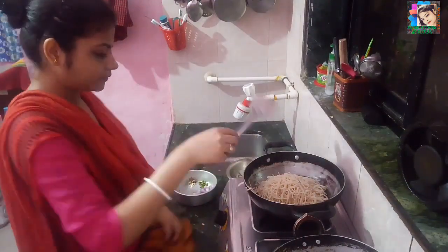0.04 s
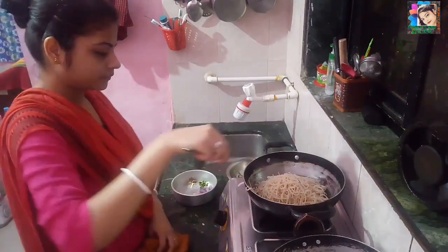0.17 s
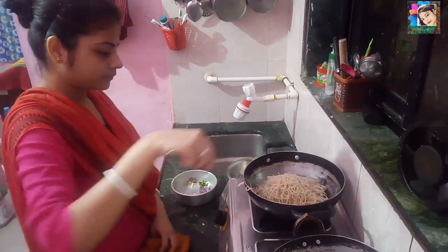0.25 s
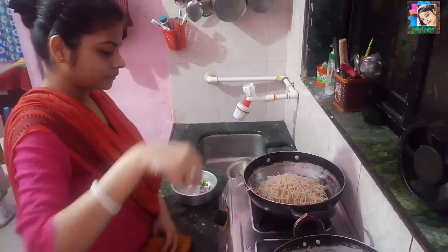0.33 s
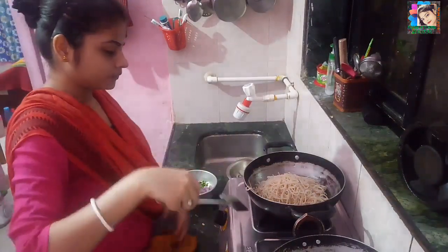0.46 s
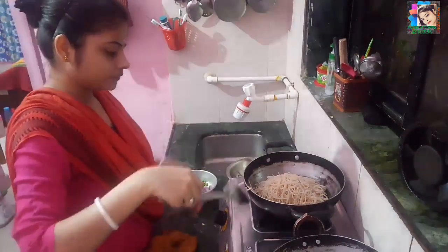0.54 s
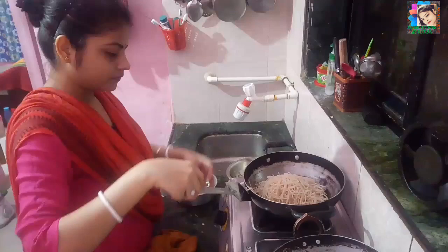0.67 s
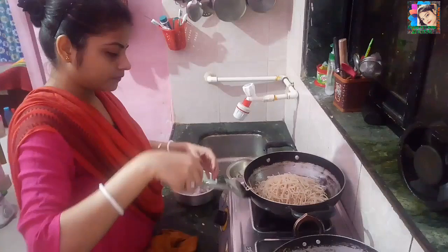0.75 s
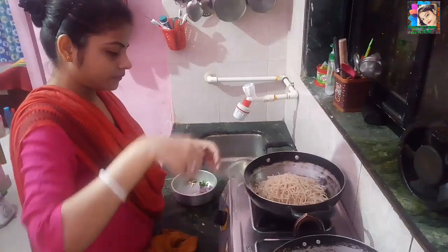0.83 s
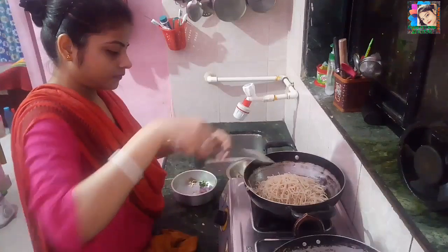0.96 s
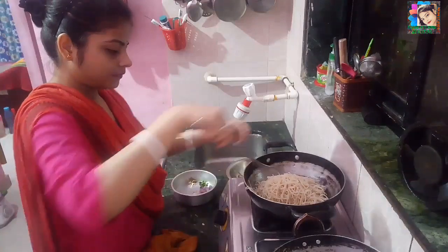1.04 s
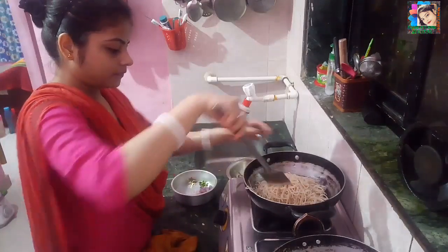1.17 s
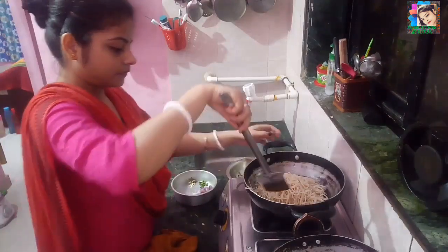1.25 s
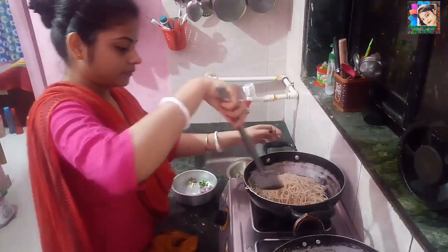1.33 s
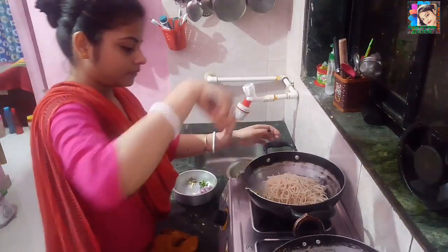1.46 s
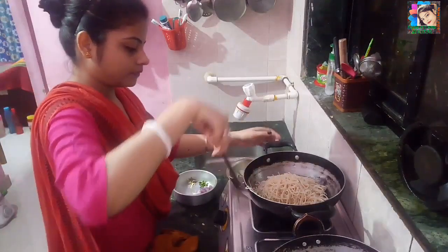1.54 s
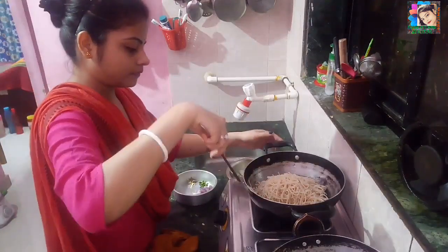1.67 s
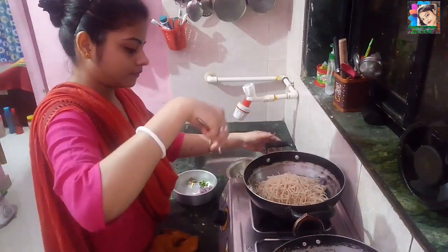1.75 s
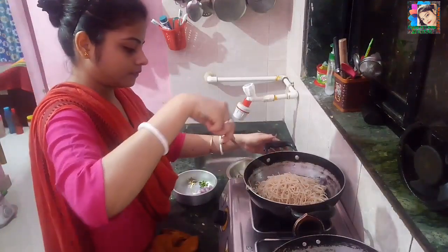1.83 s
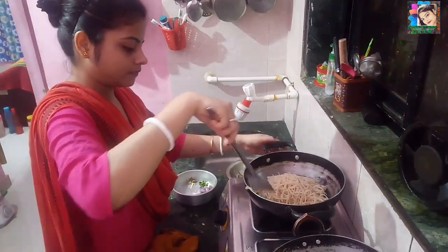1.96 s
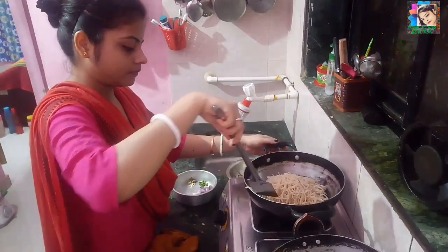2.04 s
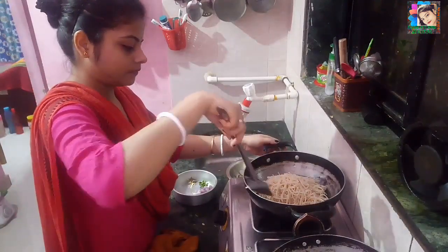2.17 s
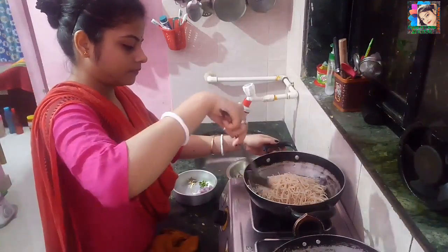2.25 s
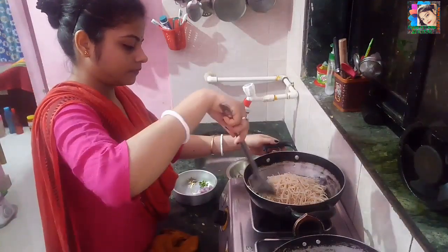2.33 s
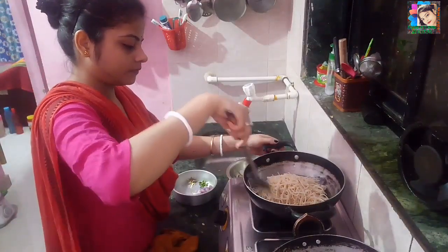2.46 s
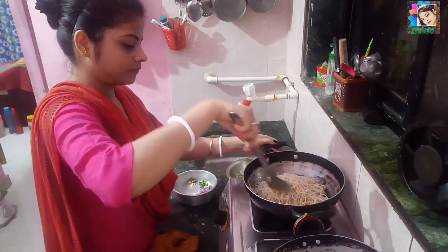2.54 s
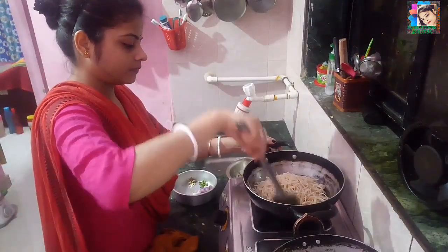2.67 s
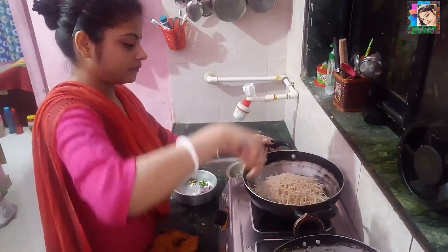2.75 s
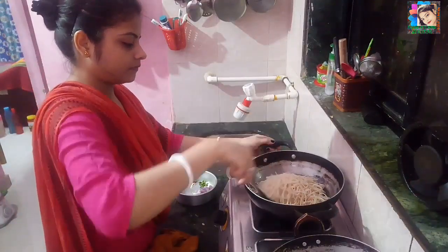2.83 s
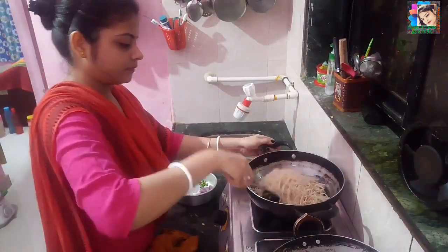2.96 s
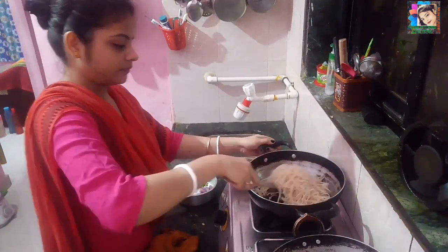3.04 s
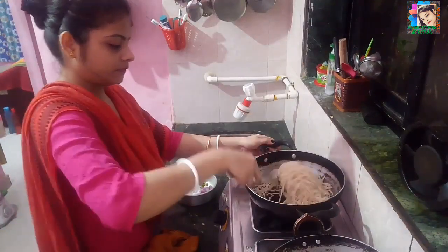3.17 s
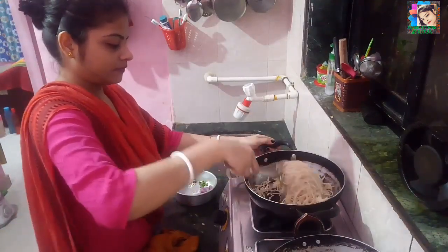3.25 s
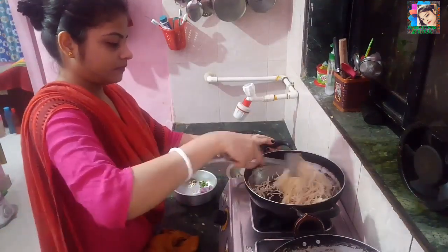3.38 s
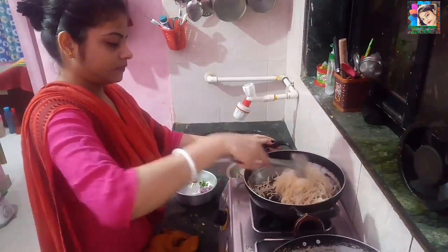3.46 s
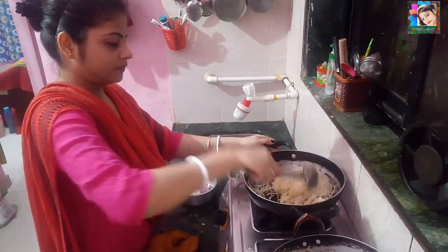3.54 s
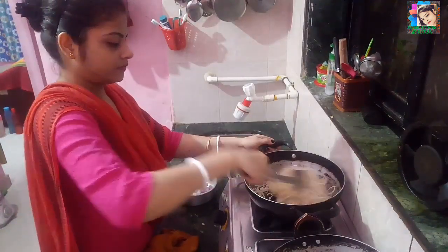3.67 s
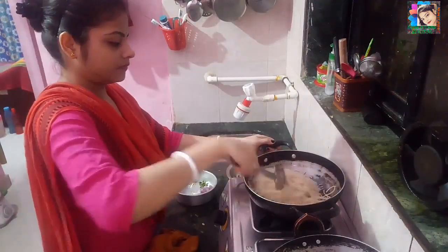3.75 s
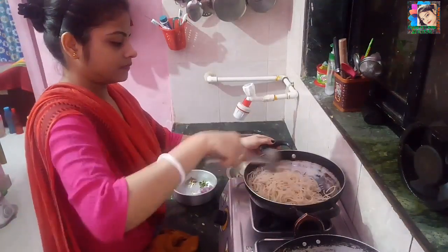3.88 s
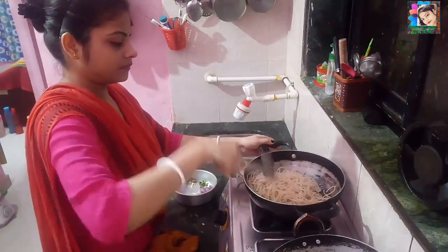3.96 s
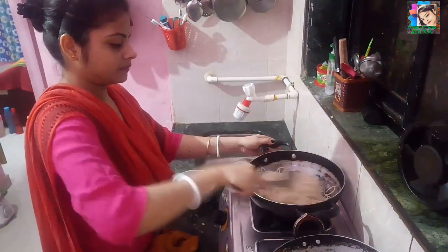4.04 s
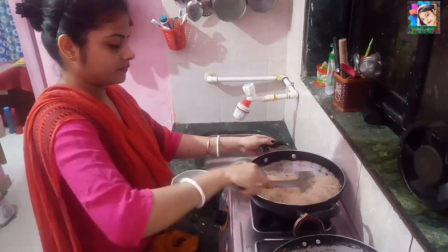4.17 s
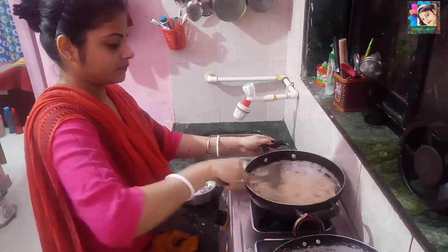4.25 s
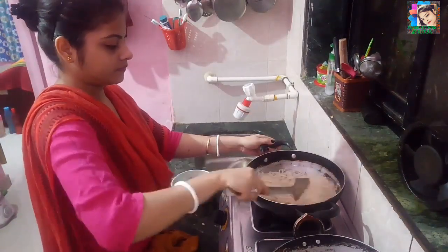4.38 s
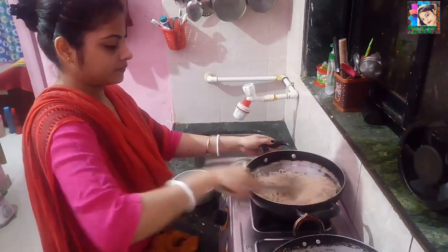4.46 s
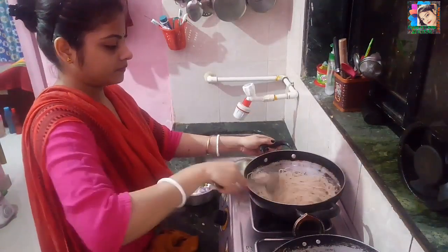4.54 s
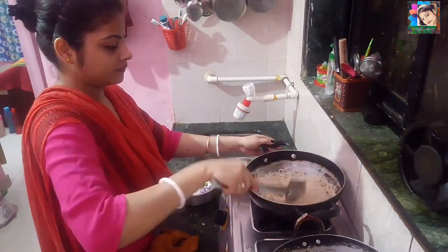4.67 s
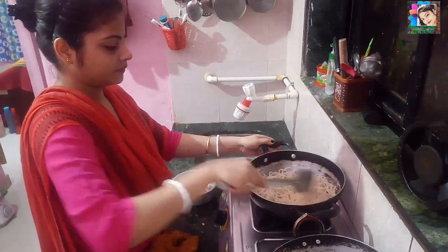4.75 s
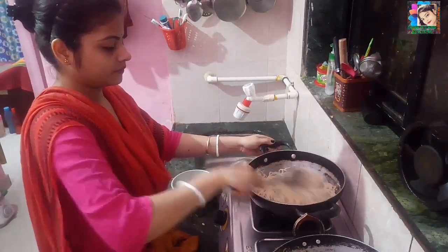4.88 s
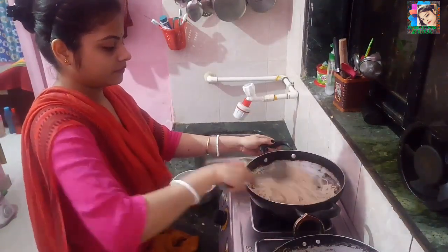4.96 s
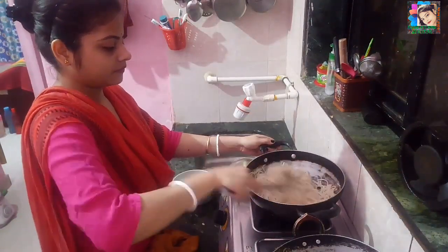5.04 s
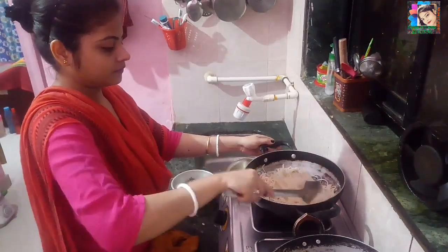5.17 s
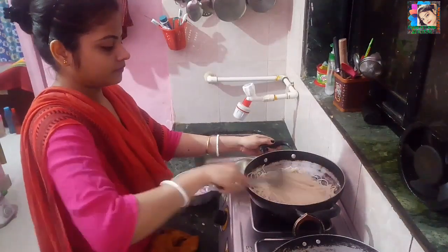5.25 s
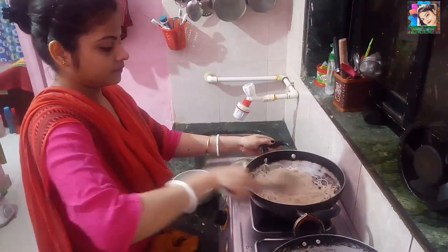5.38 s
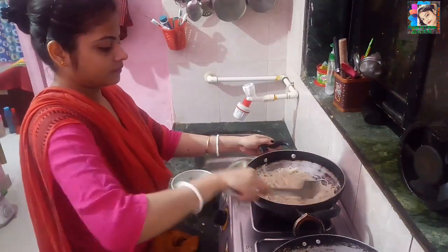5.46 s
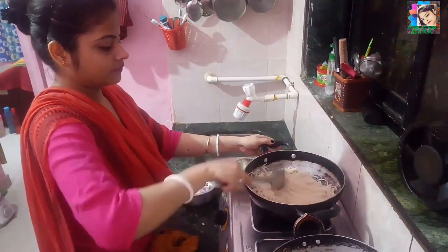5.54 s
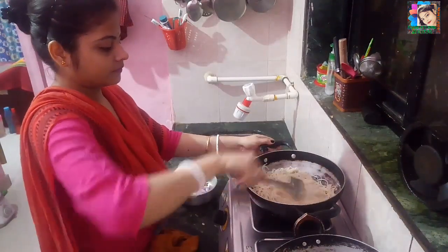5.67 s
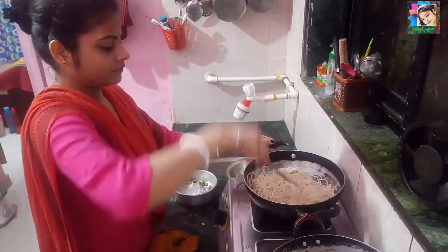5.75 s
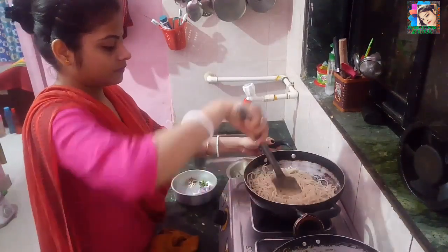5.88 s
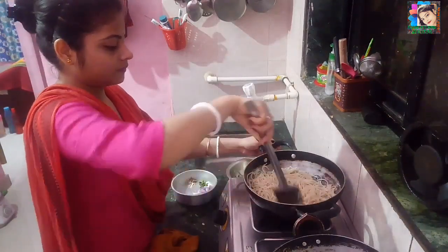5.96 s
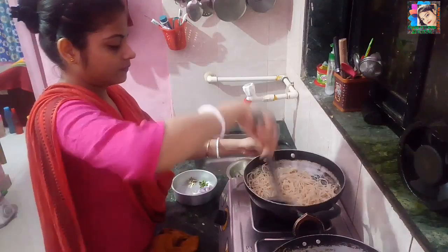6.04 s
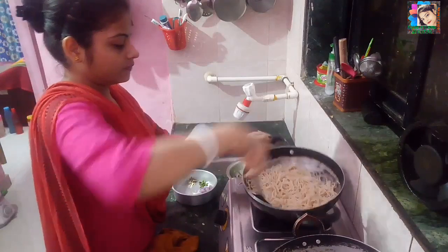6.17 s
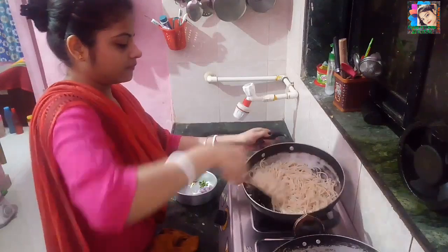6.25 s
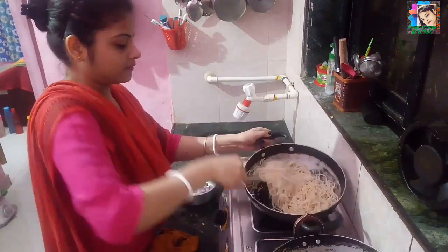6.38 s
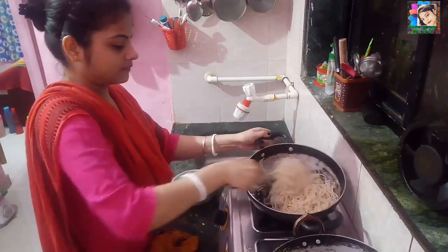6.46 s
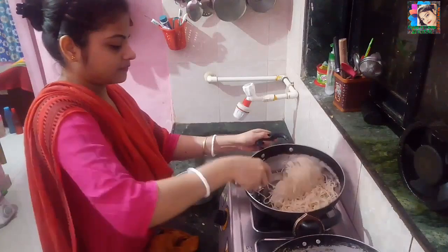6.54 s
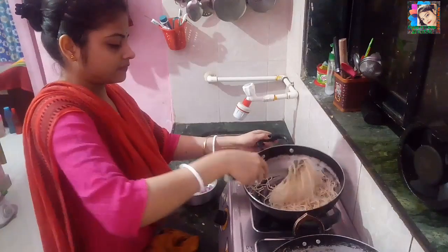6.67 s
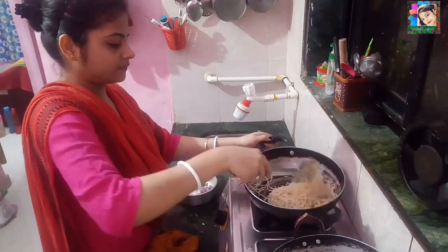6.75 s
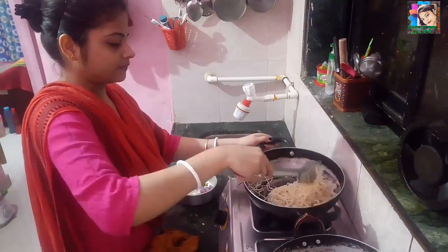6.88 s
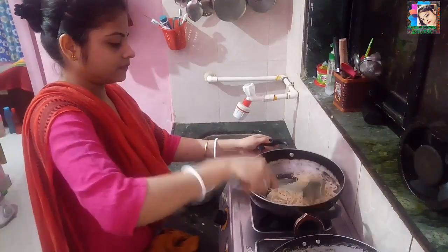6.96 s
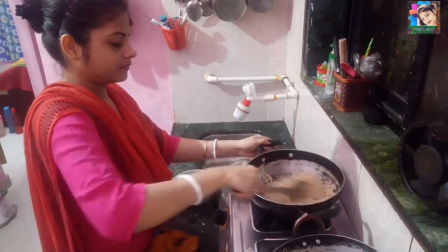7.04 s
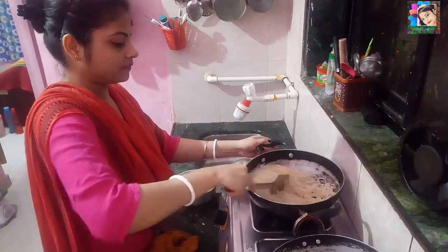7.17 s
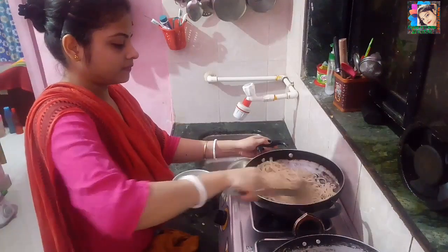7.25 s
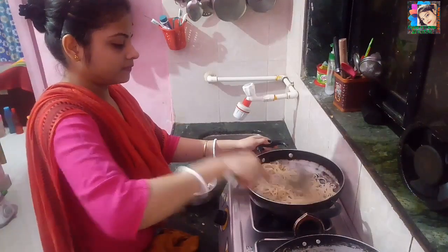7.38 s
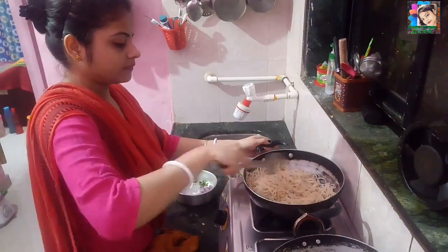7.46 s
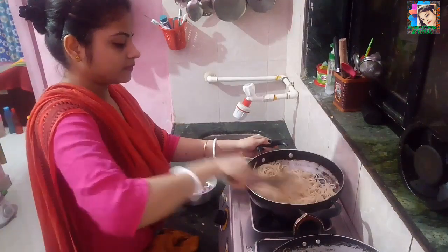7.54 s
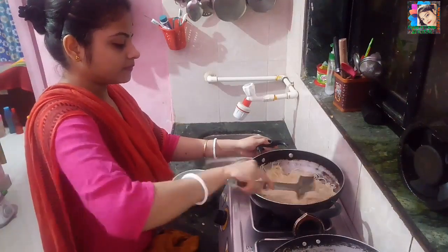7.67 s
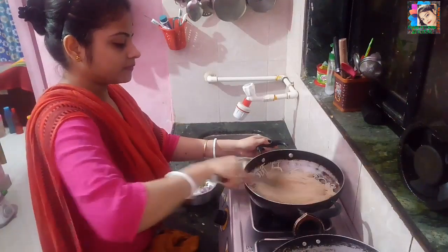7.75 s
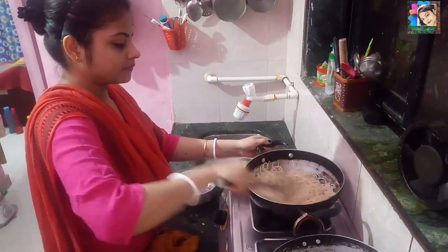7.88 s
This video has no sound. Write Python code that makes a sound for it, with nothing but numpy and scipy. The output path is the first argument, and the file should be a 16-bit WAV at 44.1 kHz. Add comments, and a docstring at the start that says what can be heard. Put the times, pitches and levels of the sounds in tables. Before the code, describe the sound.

Noodles sizzle in a wok as a spatula knocks and scrapes the steel, the frying growing much louder once they are turned.

```python
"""Boiled noodles sizzle in hot oil in a steel wok, over a gas flame and a low hum in a small kitchen.
At 0.6 s two dull bumps come through the microphone's housing. A spatula then knocks and scrapes the
ringing steel, among bright ticks and a thin whistle at 1.5 s. From 3 s, as the noodles are turned, the
oil's steam bubbles fizz much louder. A second flurry of knocks runs from 6.1 to 7.3 s. All is mono."""
import sys
import numpy as np
from scipy import signal
from scipy.fft import rfft, irfft, next_fast_len
from scipy.io import wavfile
from scipy.ndimage import uniform_filter1d

SR = 44100
rng = np.random.default_rng(int(sys.argv[2]) if len(sys.argv) > 2 else 0)


def materialize(psi):
    """Save the field psi as 16-bit PCM at rate SR to the path in sys.argv[1].

    A 1-D psi becomes a single channel; in a 2-D psi each row is a channel.
    """
    bounded = np.clip(np.atleast_2d(psi).T, -1, 1)
    quanta = np.round(bounded * 32767).astype(np.int16)
    wavfile.write(sys.argv[1], SR, quanta)


N = 348831

# Fader moves of the frying. Each row: time in seconds, fine fizz and coarse fizz in relative dB.
FIZZ_LEVELS = [(0.0, -40, -44), (0.37, -40, -47.5), (0.72, -40.5, -46), (1.34, -41, -48), (1.76, -42, -47),
               (2.11, -41.5, -47), (2.82, -40.5, -47.5), (2.97, -35, -40.5), (3.79, -31.5, -36.5),
               (3.88, -29.5, -35.5), (4.05, -28.5, -36), (4.4, -28.5, -34.5), (4.91, -29, -36),
               (5.24, -28, -34), (5.97, -31, -38), (6.41, -29, -33), (6.63, -31.5, -36.5),
               (6.94, -32.5, -39.5), (7.14, -33.5, -37.5), (7.33, -29, -32), (7.49, -29, -35),
               (7.91, -30, -35)]
# Tone of the fizz and of the flame. Each row: frequency in Hz, gain in dB.
FIZZ_EQ = [(300, -54), (500, -15.5), (780, -22.5), (1170, -14), (1400, -16.5), (1800, -11.5), (2300, -14),
           (4000, -6.5), (6000, -4), (6500, -1), (7000, -4.5), (7950, -7.5), (9000, -2), (10000, 0),
           (11000, -4.5), (13700, -16), (14800, -6), (16000, -1.5)]
FLAME_EQ = [(15, -62), (25, -12), (96, -1), (364, 0.5), (401, 3.5), (601, -7.5), (701, -2.5), (954, -5.5),
            (2500, -10.5), (3250, -77), (5500, -120)]
# Spatula hits. Each row: start in seconds, bowl drive in dB, height from 0 (floor) to 1 (wall), edge
# drive in dB, blade drive in dB, rasp offset in dB, attack in seconds, chatter T60 in seconds.
SPATULA_HITS = [(0.712, -44.5, 0.65, -60, -60, -6, 0.012, 0.14),
                (0.915, -41.5, 0.53, -45, -53, -7, 0.02, 0.23),
                (1.743, -38.5, 0.71, -40.5, -40.5, 0, 0.00069, 0.19),
                (2.159, -51, 0.17, -53, -54, -12, 0.007, .2),
                (2.242, -41.5, 0.31, -44, -45.5, -11, 0.02, 0.097),
                (2.498, -39.5, 0.62, -43, -39.5, -4, .001, 0.23),
                (2.795, -31.5, .95, -34, -38, -19, 0.0018, 0.16),
                (2.854, -47, 1, -46.5, -46, 9, .0065, 0.18), (2.88, -35, 0.68, -42, -42, 2, 0.0054, 0.23),
                (6.14, -34.5, 0.93, -48, -36, -12, 0.0027, 0.12),
                (6.209, -38, 0.39, -48, -44, 11, 0.0023, 0.035),
                (6.28, -37, 0.33, -57, -54, -4, 0.012, .15), (6.32, -51, 0.37, -53, -47.5, 13, 0.013, 0.84),
                (6.467, -27.5, 0.5, -42, -50, 5.5, 0.014, 0.23),
                (6.519, -49, 0.057, -68, -47, -2, 0.0075, 0.12),
                (6.601, -43.5, .05, -70, -60, -5, 0.0067, 0.33),
                (6.865, -47, 0.044, -57, -51, 5.5, 0.0054, 0.57),
                (7.035, -50, 0.078, -67, -62, 15, 0.0027, 0.33),
                (7.125, -40.5, 0.26, -50, -40.5, 9, 0.0027, 0.16),
                (7.313, -42, .55, -52, -55, 10.5, 0.0032, 0.19),
                (7.333, -40, 0.22, -39.5, -42, 9.5, .004, 0.066)]
# Modes of the wok's loaded floor, wall, rim and lip, and of the spatula blade.
# Each row: pitch in Hz, gain in dB, T60 in seconds.
FLOOR_MODES = [(209, -4, .14), (316, 2, .16), (365, -10, .08), (440, -5, .16), (506, -6, .14)]
WALL_MODES = [(590, -6, .07), (668, -1, .08), (704, -1, .09), (770, -5, .1), (875, -11, .1)]
RIM_MODES = [(1112, -8, .13), (1203, -13, .13), (1299, -11, .1), (1402, 2, .15)]
LIP_MODES = [(1760, -3, .08), (1803, 1, .1), (1900, -7, .06), (2040, -11, .05), (2350, -6, .05)]
BLADE_MODES = [(3418, -11, .1), (3946, -2, .08), (4780, -12, .05), (5460, -5, .08), (5640, 2, .09),
               (5920, -3, .1), (6850, -5, .06), (7150, -2, .06), (8500, -6, .04), (9640, -3, .05),
               (11200, -3, .07)]
# Bright ticks. Each row: start in seconds, level in relative dB, pitch in Hz.
TICK_CUES = [(0.5551, -9, 9900), (0.6357, -12.5, 4800), (2.463, -11, 6170), (2.64, -12, 10030),
             (2.6894, -10, 6000), (2.7624, -25, 10100), (2.855, -8, 3470), (4.2514, -30, 8800),
             (6.1397, 0, 11230), (6.146, -10, 7100)]
# Envelope of the whistle. Each row: time in seconds, level in dB.
WHISTLE_LEVELS = [(1.5, -63), (1.59, -51), (1.625, -48), (1.7, -57), (1.765, -43), (1.87, -62), (1.96, -57)]
# Bumps on the housing. Each row: start in seconds, size of the pressure step in dB.
BUMP_CUES = [(0.6423, -14.5), (0.7104, -11)]
# Path of the hum. Each row: time in seconds, centre pitch in Hz, level in dB.
HUM_PATH = [(0, 117, -55), (.2, 116.6, -55), (.55, 118.3, -52.5), (.8, 130.7, -47.5), (1.2, 119, -68),
            (2.12, 119, -61), (2.3, 126.3, -53), (2.5, 119, -59), (3.04, 119.8, -55), (3.5, 122, -73),
            (3.97, 126.4, -65), (4.08, 135, -46.5), (4.45, 130, -73), (4.8, 139, -54.5), (5.3, 124, -80),
            (5.55, 119, -56), (5.9, 115, -76), (6.55, 130, -54.5), (6.95, 120, -53), (7.25, 129, -68),
            (7.45, 114, -51), (7.7, 120, -72), (7.91, 124, -52)]

STRIKE_DB, SHARP_S = 26, .0025   # strike over chatter; attacks slower than SHARP_S soften it
HEIGHT_LOSS_DB = 14   # floor or wall rings this much less when hit at the far end of the bowl
RIM_DB = -1.5   # the rim rings with the lip, a little less
BOWL_RASP_DB = -2   # noodles cushion the bowl's rasp
SPLASH_DB, STIR_DB = 12, -26   # offsets from the blade's chatter and the coarse fizz fader
WHISTLE_HZ, WHISTLE_SAG_HZ_PER_S = 3480, 220
BUMP_HZ, BUMP_DAMPING = 110, 0.55
FLAME_DB, FLAME_SWAY_DB = -50.5, 0.67
KITCHEN_DB, KITCHEN_T60_S = -3.5, .32
CUTOFF_HZ = 15520


def sizzle(fine_db, coarse_db):
    """Thousands of steam bubbles burst each second; the bands flicker together and on their own."""
    edges = np.geomspace(300, 16500, 12)
    shared_flicker, out = drift(8.3), 0
    size = next_fast_len(N)
    hz = np.arange(size // 2 + 1) * SR / size
    pops = [rng.standard_normal(N) + .5 * grains(3000, spread_db=3.0) for _ in range(2)]
    spectra = [rfft(rms_one(equalise(p, FIZZ_EQ)), size) for p in pops]
    for k, (low, high) in enumerate(zip(edges, edges[1:])):
        band = irfft(spectra[k % 2] * ((hz >= low) & (hz < high)), size)[:N]
        centre_hz = np.sqrt(low * high)
        fine = np.clip(np.log(centre_hz / 3500) / np.log(9000 / 3500), 0, 1)   # small bubbles ring high
        if low > 11000:   # the airiest hiss follows the oil more sluggishly
            fine_db = uniform_filter1d(fine_db, SR // 8)
        level_db = fine * (fine_db + 6.5) + (1 - fine) * (coarse_db + 12.5)
        out = out + band * from_db(level_db + .5 * shared_flicker + 0.76 * drift(17.5))
    return out


def spatula_contact(part):
    """The spatula strikes, then chatters: one part's impulses and its chatter and rasp envelopes."""
    strikes, chatter, rasp = np.zeros((3, N))
    t = np.arange(SR // 2) / SR
    cushion_db = BOWL_RASP_DB if part in ("floor", "wall") else 0
    for start, bowl_db, height, edge_db, blade_db, rasp_db, attack, t60 in SPATULA_HITS:
        drive_db = {"floor": bowl_db - HEIGHT_LOSS_DB * height,
                    "wall": bowl_db - HEIGHT_LOSS_DB * (1 - height),
                    "rim": edge_db + RIM_DB, "lip": edge_db, "blade": blade_db}[part]
        at = round(start * SR)
        age = t[:N - at]
        decay_db = 60 * np.maximum(age - attack, 0) / t60
        envelope = from_db(drive_db - decay_db) * np.minimum(age / attack, 1)
        strikes[at] = from_db(drive_db + STRIKE_DB) / (1 + attack / SHARP_S)
        chatter[at:at + len(age)] += envelope
        rasp[at:at + len(age)] += envelope * from_db(rasp_db + cushion_db)
    return strikes, chatter, rasp


def wok(stir_db):
    """Hits ring wok and blade with a gritty rasp; the blade's drag keeps two rim modes singing."""
    out, grit = np.zeros(N), grains(6000, spread_db=2.0)
    parts = dict(floor=FLOOR_MODES, wall=WALL_MODES, rim=RIM_MODES, lip=LIP_MODES, blade=BLADE_MODES)
    for part, modes in parts.items():
        strikes, chatter, rasp = spatula_contact(part)
        force = strikes + chatter * rng.standard_normal(N)
        for j, (hz, db, t60) in enumerate(modes):
            out += (-1) ** j * from_db(db) * ring(force, hz, t60)
        rasp_band_hz = [modes[0][0], modes[-1][0] * 1.18]
        out += rasp * rms_one(butter(grit, 2, rasp_band_hz, "band"))
    drag = from_db(stir_db) * rng.standard_normal(N)
    out += sum(ring(drag, hz, t60) for hz, _, t60 in RIM_MODES[:2])
    return butter(out, 3, 190, "high")   # a pan this size radiates no bass


def oil_splash():
    """Each hit throws up oil: a burst of bright fizz riding the blade's chatter."""
    _, chatter, _ = spatula_contact("blade")
    return from_db(SPLASH_DB) * chatter * rms_one(equalise(rng.standard_normal(N), FIZZ_EQ))


def bright_ticks():
    """Short, bright ticks of pitched noise, some from spatula knocks, some from spitting oil."""
    out, t = np.zeros(N), np.arange(SR // 20) / SR
    for start, level_db, hz in TICK_CUES:
        at = round(start * SR)
        envelope = from_db(level_db - 23.0 - 60 * t / 0.048)
        tick = envelope * ring(rng.standard_normal(len(t)), hz, t60=0.0049)
        out[at:at + len(t)] += tick[:N - at]
    return out


def whistle():
    """A thin, wavering tone that sags in pitch."""
    level_db, = automation(WHISTLE_LEVELS)
    start, end = WHISTLE_LEVELS[0][0], WHISTLE_LEVELS[-1][0]
    t = np.arange(N) / SR
    gate = (t > start) & (t < end)
    hz = WHISTLE_HZ - WHISTLE_SAG_HZ_PER_S * (t - start) + 30 * drift(45.0)
    tone = np.sqrt(2) * np.sin(2 * np.pi * np.cumsum(hz) / SR)
    return gate * from_db(level_db + 3.1 * drift(40.0)) * tone


def housing_bumps():
    """Dull thumps: pressure steps jump, undershoot and settle through the microphone's bass roll-off."""
    kicks = np.zeros(N)
    for start, step_db in BUMP_CUES:
        kicks[round(start * SR)] = from_db(step_db)
    w = 2 * np.pi * BUMP_HZ
    b, a = signal.bilinear([1, 0, 0], [1, 2 * BUMP_DAMPING * w, w * w], SR)
    thumps = signal.lfilter(b, a, np.cumsum(kicks))
    return butter(thumps, 2, 3500, "low")


def gas_flame():
    """A soft bed of gas flame and kitchen rumble, gently swaying in level."""
    level_db = FLAME_DB - FLAME_SWAY_DB * drift(2.7) + 0.5 * drift(8.4)
    return from_db(level_db) * rms_one(equalise(rng.standard_normal(N), FLAME_EQ))


def hum():
    """A low hum comes and goes: a narrow band of noise with a wandering centre."""
    hz, level_db = automation(HUM_PATH)
    phase = 2 * np.pi * np.cumsum(hz) / SR
    return from_db(level_db) * (drift(25.0) * np.sin(phase) + drift(16.0) * np.cos(phase))


def kitchen_reverb(x):
    """The small room answers with a short tail, darker than the direct sound."""
    t = np.arange(SR // 2) / SR
    tail = rng.standard_normal(len(t)) * from_db(-60 * t / KITCHEN_T60_S) * (t > .004)
    tail = signal.lfilter([.5], [1, -.5], tail)
    return signal.fftconvolve(x, tail / np.sqrt(np.sum(tail ** 2)))[:N]


def ring(x, hz, t60):
    """One resonant mode; white noise comes out at about the rms it went in."""
    r, w = from_db(-60 / (t60 * SR)), 2 * np.pi * hz / SR
    return signal.lfilter([0, 2 * np.sqrt(1 - r) * np.sin(w)], [1, -2 * r * np.cos(w), r * r], x + 1e-18)


def grains(per_s, spread_db):
    """Crackle: random clicks of uneven size and sign, at unit rms."""
    sizes = from_db(spread_db * np.minimum(rng.exponential(1, N), 5)) * rng.choice([-1, 1], N)
    return rms_one(sizes * (rng.random(N) < per_s / SR))


def drift(rate_hz):
    """A smooth random modulator at unit rms: low-passed noise, drawn every 40 samples."""
    r = np.exp(-80 * np.pi * rate_hz / SR)
    slow = signal.lfilter([1], [1, -2 * r, r * r], rng.standard_normal(N // 40 + 2002))[2000:]
    return np.interp(np.arange(N) / 40, np.arange(len(slow)), rms_one(slow))


def automation(rows):
    """Timed breakpoints to one full-length curve per column."""
    times, *columns = np.transpose(rows)
    return [np.interp(np.arange(N) / SR, times, column) for column in columns]


def equalise(x, curve):
    """Colour a signal with an EQ curve of (Hz, dB) points."""
    size = next_fast_len(N)
    hz = np.maximum(np.arange(size // 2 + 1) * SR / size, 1)
    point_hz, point_db = np.transpose(curve)
    gain_db = np.interp(np.log(hz), np.log(point_hz), point_db)
    return irfft(rfft(x, size) * from_db(gain_db), size)[:N]


def butter(x, order, hz, kind):
    """A low-, high- or band-pass filter."""
    return signal.sosfilt(signal.butter(order, hz, kind, fs=SR, output="sos"), x)


def from_db(db):
    """Decibels to gain."""
    return 10 ** (np.asarray(db) / 20)


def rms_one(x):
    """Scale to unit rms."""
    return x / np.sqrt(np.mean(x ** 2) + 1e-20)


def scene():
    """The mix, alike in both channels; only the wok and its accents feed the reverb."""
    fine_db, coarse_db = automation(FIZZ_LEVELS)
    action = wok(coarse_db + STIR_DB) + whistle() + bright_ticks() + oil_splash()
    flame = gas_flame()
    frying = sizzle(fine_db, coarse_db)
    room = from_db(KITCHEN_DB) * kitchen_reverb(action)
    mono = frying + action + room + flame + hum() + housing_bumps()
    return np.array([mono, mono])


def record(dry):
    """A steep high cut takes off the very top."""
    return signal.sosfilt(signal.ellip(16, .3, 80, CUTOFF_HZ, fs=SR, output="sos"), dry)


dry = scene()
out = record(dry)
materialize(out)
```